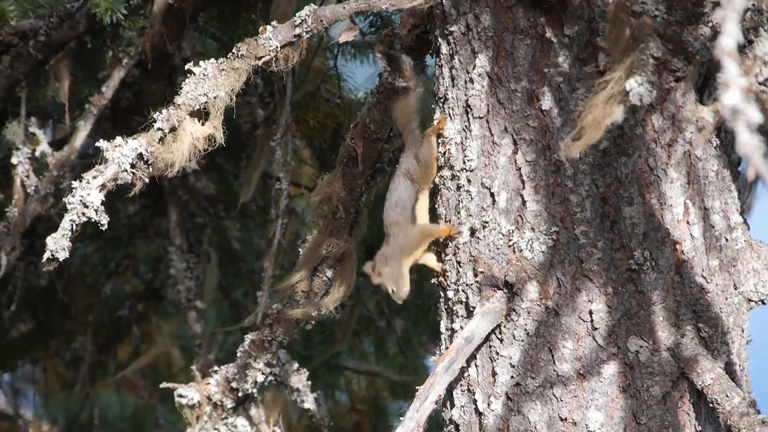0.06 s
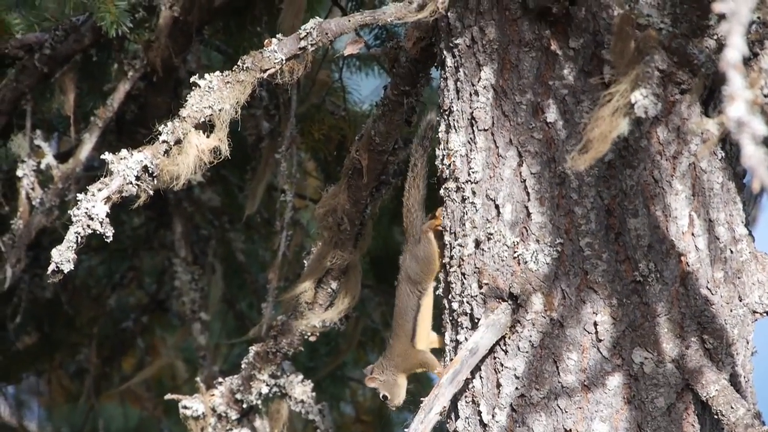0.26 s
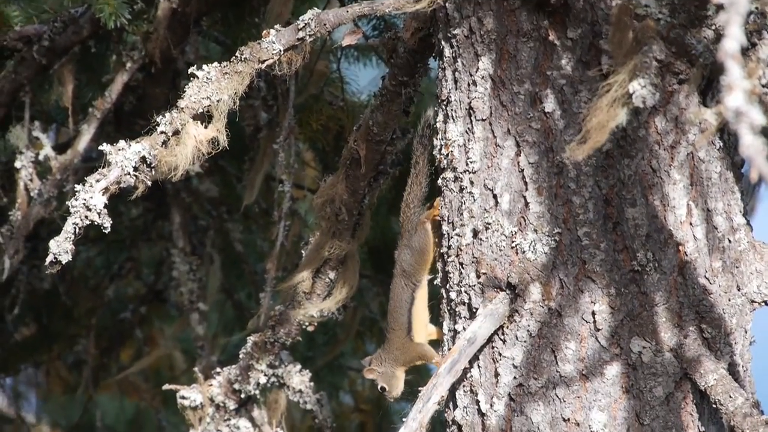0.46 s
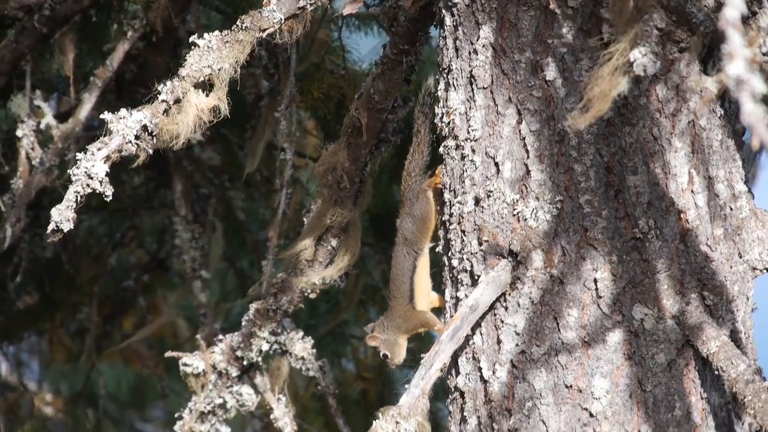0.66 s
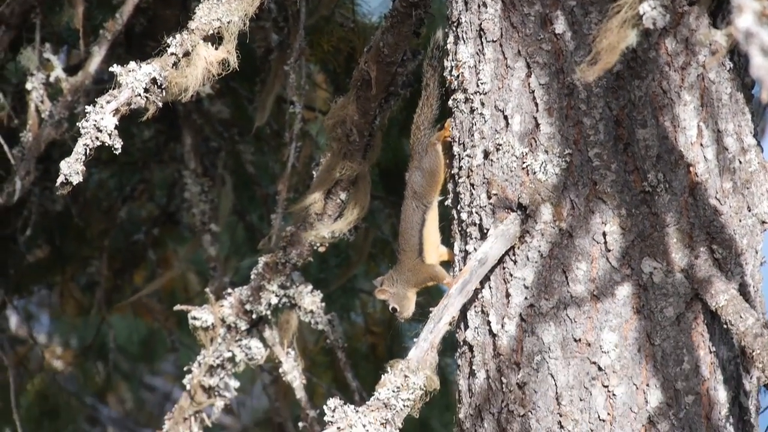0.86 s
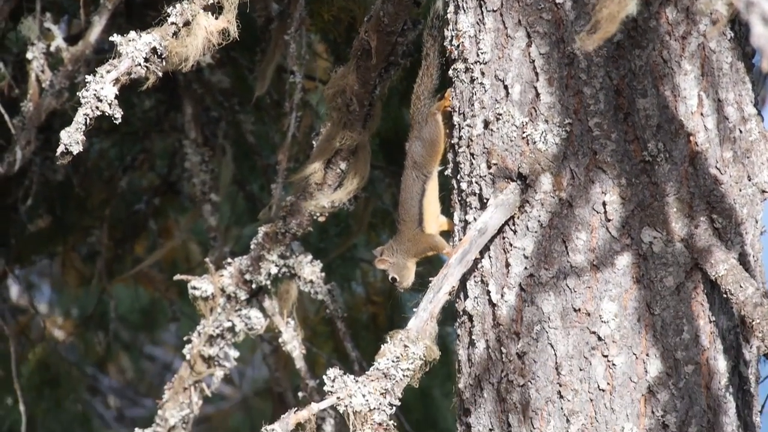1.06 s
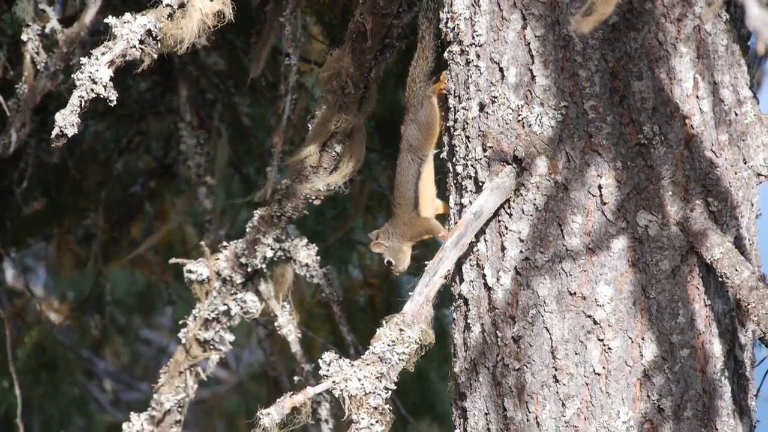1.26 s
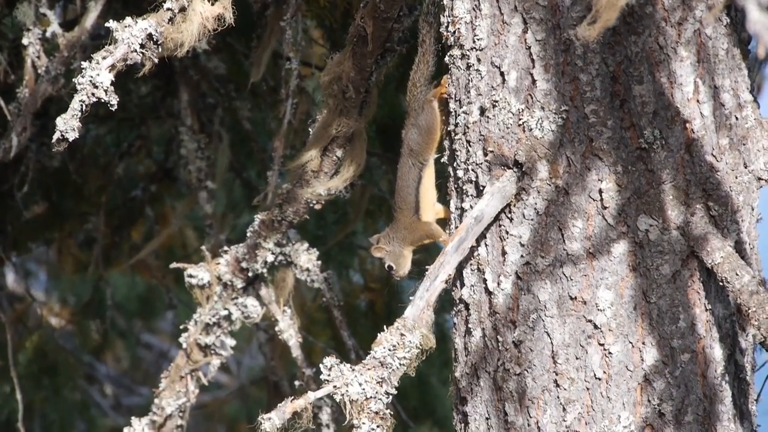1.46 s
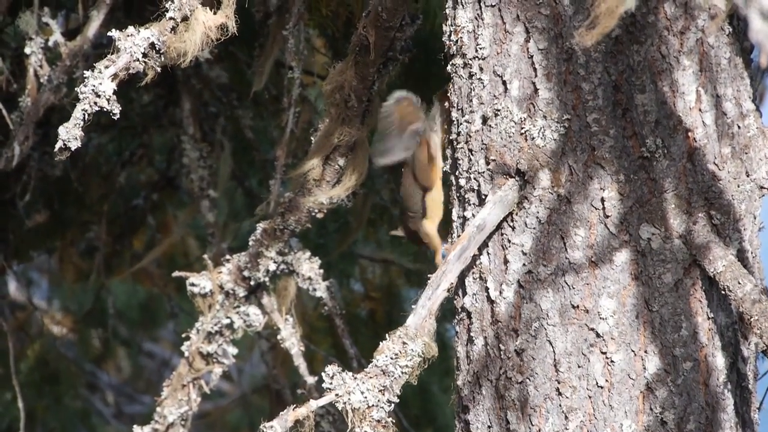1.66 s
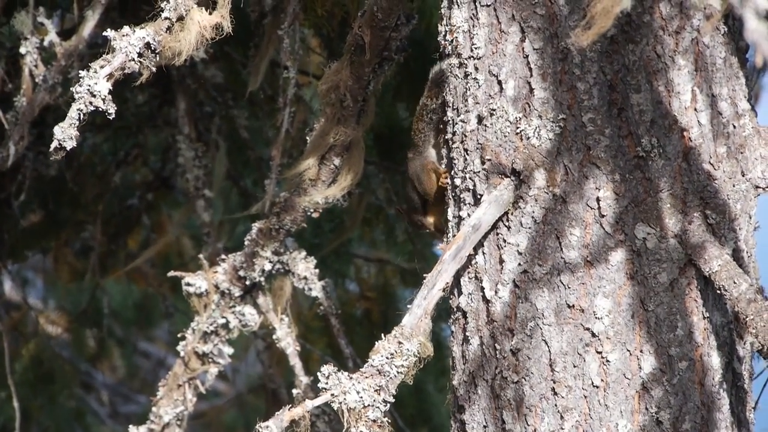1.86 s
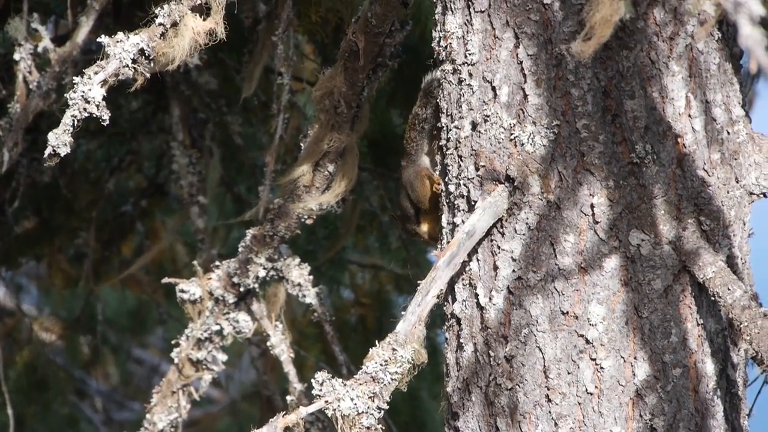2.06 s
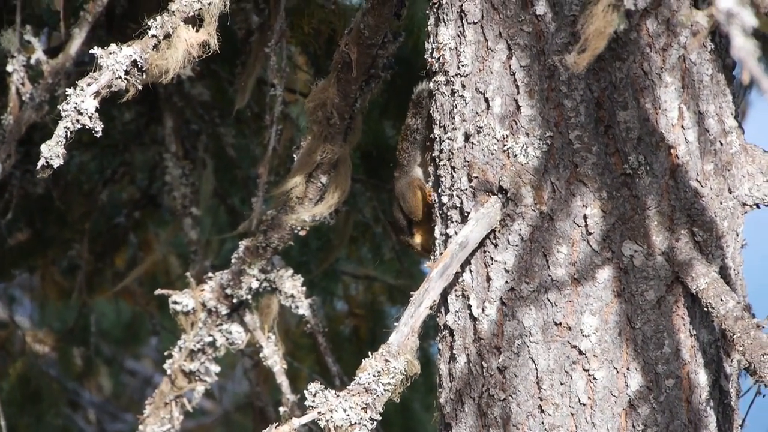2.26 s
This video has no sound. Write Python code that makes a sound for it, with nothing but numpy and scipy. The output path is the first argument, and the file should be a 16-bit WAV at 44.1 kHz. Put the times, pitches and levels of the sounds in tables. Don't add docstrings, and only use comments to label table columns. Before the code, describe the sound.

Two short squirrel alarm calls, bright bark sliding down, over soft forest hum and wind thumps

```python
import sys
import numpy as np
from scipy import signal
from scipy.fft import rfft, irfft, next_fast_len
from scipy.io import wavfile
from scipy.ndimage import uniform_filter1d, map_coordinates

SR = 44100
rng = np.random.default_rng(int(sys.argv[2]) if len(sys.argv) > 2 else 0)


def ratio(d):
    e = np.asarray(d, float) / 20
    return 10 ** e


def generate_wav(sig):
    pcm = np.round(np.clip(np.atleast_2d(sig).T, -1, 1) * 32767).astype(np.int16)
    wavfile.write(sys.argv[1], SR, pcm)


N = 101430

# f/Hz, level/dB
FOREST_COLOUR = [(200, -16), (450, -16.5), (900, -11.5), (1300, -15.5), (1700, -19), (2500, -22.5),
                 (3000, -20.5), (15500, -41.5)]
# f/Hz, width/Hz, level/dB
FOREST_BUMPS = [(776.5, 31.5, 5.5), (912, 15.6, 7), (1137.4, 21, 8.5), (1233, 141, 5.5), (1955, 157, 4),
                (3940, 9.5, 4), (4950, 79, 5), (5600, 35, 1.5)]
# f/Hz, likeness/0-1
FOREST_ALIKE = [(60, 0.19), (180, 0.027), (550, 0.43), (1650, 0.68), (4970, 0.64), (15000, 0.3)]
# f/Hz, left over right level/dB
FOREST_LEAN = [(550, -1), (1300, 2), (2400, 0), (4900, 2), (15000, 0)]
# t/s, level/dB
GUSTS = [(0, -55.5), (.2, -54), (.55, -47), (.69, -56.5), (.8, -45.5), (.92, -52.5), (.945, -72),
         (1.09, -54.5), (1.22, -54.5), (1.31, -59), (1.45, -48), (1.59, -61), (1.74, -58), (1.96, -61),
         (2.1, -55.5), (2.27, -54)]
# f/Hz, level/dB
PORT_COLOUR = [(25, -49), (45, -27.5), (85, -0.5), (140, -0.5), (210, -13.5), (320, -17), (500, -49)]
# t/s, peak level/dB, f/Hz
RIGHT_THUMPS = [(0.022, -35, 167), (0.034, -40, 156), (0.127, -40.5, 161), (0.167, -42, 144),
                (0.185, -41.5, 132), (0.213, -30, 153), (0.261, -32, 155), (0.281, -46, 115),
                (0.307, -41, 179), (0.328, -38, 163), (0.348, -46.0, 122), (0.369, -37, 146),
                (0.38, -35.5, 162), (0.396, -40.5, 162), (0.412, -40, 201), (0.426, -57, 135),
                (0.448, -38.5, 126), (0.474, -38.5, 151), (0.487, -49, 136), (0.501, -49.5, 142),
                (0.515, -40, 145), (0.53, -40.0, 143), (0.558, -48, 137), (0.609, -30.5, 188),
                (0.633, -47, 168), (0.657, -40, 118), (0.743, -48, 140), (0.771, -30.5, 167),
                (0.788, -39, 85), (0.804, -39.5, 160), (0.825, -36.5, 132), (0.848, -44.5, 194),
                (0.865, -37, 152), (0.892, -39, 159), (0.914, -38.5, 129), (0.977, -36, 170),
                (0.993, -36, 153), (1.041, -36, 123), (1.083, -39, 138), (1.109, -42.5, 179),
                (1.144, -35.5, 147), (1.171, -42, 151), (1.182, -27.5, 139), (1.214, -40, 123),
                (1.367, -41, 143), (1.431, -37, 175), (1.448, -52, 128), (1.472, -45, 168),
                (1.495, -35.5, 147), (1.547, -43, 101), (1.717, -44.5, 149), (1.755, -44.5, 126),
                (1.849, -46, 142), (1.869, -40.5, 160), (1.882, -48, 134), (1.906, -47, 161),
                (2.05, -30.5, 168), (2.184, -43, 147), (2.212, -49.5, 114), (2.272, -40, 129)]
# t/s, peak level/dB, f/Hz
LEFT_PUFFS = [
    (.228, -52, 91),
    (.806, -56, 100),
    (.942, -54, 110),
    (1.057, -50, 90),
]
# t/s, peak level/dB,
# f/Hz, width/Hz
TICKS = [(.2245, -49, 5000, 5000), (.281, -48, 8500, 4000), (.297, -55, 9500, 4000),
         (.309, -52, 10500, 5000), (1.7425, -46, 4970, 5000), (1.2332, -51, 750, 110),
         (1.2412, -43.5, 880, 280), (1.2414, -48, 3170, 600), (1.2475, -51, 1150, 150),
         (1.7075, -45.5, 1000, 350), (1.771, -58, 10760, 80), (2.098, -56, 10300, 1200),
         (2.13, -62, 8800, 2500)]
# start t/s, rise/s, fall by 60 dB/s, level/dB
HISS = [
    (0.222, 0.0025, 0.2, -53),
    (1.742, .003, 0.25, -59),
    (.275, 0.02, 0.3, -60),
    (1.79, 0.02, 0.5, -70),
]
# f/Hz, level/dB
HISS_COLOUR = [(3000, -3), (5800, -6), (8000, -11.5), (10200, -3.5), (12000, -16), (13900, -20),
               (14900, -10), (15600, -44)]
# start t/s, rise/s, fall by 60 dB/s, level/dB, f/Hz
BREATH = [
    (.285, .015, 0.17, -66, 11400),
    (.33, 0.047, 0.25, -67.5, 10300),
    (1.8, 0.056, .3, -74, 9400),
]
# start t/s, length/s, level/dB
CHIRPS = [
    (0.2135, 0.0092, -36),
    (1.7286, 0.0086, -41),
]
# t/s, pitch f/Hz, level/dB, mouth opening/0-1, rasp level/dB
BARKS = [
    [(.2235, 2200, -46, 0, -60), (.225, 2175, -40, 0, -52), (.230, 2143, -34.5, .3, -47),
     (.238, 2116, -32.5, .85, -51.5), (.249, 2150, -30, .9, -50), (.2565, 2190, -36, .85, -50),
     (.263, 2140, -42, 1, -55), (.270, 2135, -52, 1, -63), (.278, 2160, -64, 1, -73)],
    [(1.7418, 2210, -47, .3, -58), (1.7435, 2180, -41.5, .2, -52), (1.746, 2162, -40, 0, -50),
     (1.753, 2120, -38.5, .9, -51), (1.758, 2135, -36, 1, -50), (1.764, 2183, -39, .3, -49),
     (1.770, 2175, -46, 1, -52), (1.776, 2145, -58, 1.1, -64), (1.788, 2150, -66, 1, -73)],
]
# level with mouth shut/dB, with mouth open/dB, left over right level/dB
OVERTONES = [
    [(-25, -9.5, 7.5), (-0.5, -16, 0), (0, 0, 0.5), (4.5, -1, -5.5), (-14, -16, 4), (-22, -26, 6)],
    [(-16, -8, 5), (-7, -20, 1), (0, 0, 0.5), (-17, -10, 1), (-26, -30, 3), (-32, -32, 0)],
]
# t/s, pitch f/Hz, level/dB, second partial against the first/dB
SLIDES = [
    [(.266, 2130, -50, -28), (.283, 1916, -38, -42), (.303, 1670, -43, -31), (.321, 1540, -40, -30),
     (.348, 1285, -38.5, -33), (.371, 1160, -45, -28), (.392, 1055, -52, -17), (.418, 890, -63, -4),
     (.452, 690, -62, -16)],
    [(1.781, 2100, -60, -25), (1.791, 1915, -45, -50), (1.817, 1500, -43, -27), (1.836, 1250, -45, -17),
     (1.854, 1190, -45.5, -17), (1.862, 1160, -51, -15), (1.897, 1085, -53, -16), (1.908, 990, -64, -10),
     (1.962, 520, -66, -20)],
]
# f/Hz, left over right level/dB
VOICE_LEAN = [(1200, 0.5), (1800, 0.5), (2150, -0.5), (3000, 3)]
# f/Hz, phase/rad
VOICE_LEAD = [(520, -.3), (1500, -.22), (2150, -.43), (2840, -.14), (3700, -.5), (5250, .1), (5860, -.1),
              (15200, .1)]

FOREST_DB, FOREST_SWAY_DB, PATCHY_DB = -57.3, .5, 1.44
RIGHT_LUMP_DB, LEFT_LUMP_DB = 3, 1.8
LEFT_WIND_DB, LEFT_LIFT = -64, 0.37
PORT_CUT_HZ = 55
THUMP_CYCLES, THUMP_RINGS = 0.39, 2.07
LEAK_DB, LEAK_HZ, BASS_LEAK_DB = -9, 244, -23
NEAR_DB, NEAR_T60_S = -17, .05
FAR_DB, FAR_T60_S, FAR_DELAY_S = -18.5, .38, .012
ECHO_SPREAD = 1.2
BREATH_WIDTH_HZ = 800
CHIRP_FROM_HZ, CHIRP_TO_HZ, CHIRP_BEND, CHIRP_FADE_DB = 1300, 2150, .55, -13
PITCH_JITTER = .002
FLUTTER_DB, FLUTTER_RATE_HZ = 4.2, 250
FAINT_FLUTTER = .05


def unit(x):
    return x / np.sqrt(np.mean(x ** 2) + 1e-20)


def along(points, hz):
    f, v = np.transpose(points)
    return np.interp(np.log(hz + 1), np.log(f + 1), v)


def wobble(rate):
    knots = rng.standard_normal(int(N * 400 / SR) + 4)
    return map_coordinates(knots, [np.arange(N) * min(rate, 400) / SR])


def filtered(x, response):
    m = next_fast_len(N + SR // 2)
    return irfft(rfft(x, m) * response(np.fft.rfftfreq(m, 1 / SR)), m)[..., :N]


def forest():
    z = signal.stft(rng.standard_normal((2, N)), nperseg=512)[2]
    patches = uniform_filter1d(rng.standard_normal(z.shape[1:]), size=5, axis=0)
    patches = uniform_filter1d(patches, size=8, axis=1)
    pair = signal.istft(z * ratio(PATCHY_DB * unit(patches)), nperseg=512)[1][:, :N]

    def colour(hz):
        bumps_db = sum(db * np.exp(-((hz - c) / w) ** 2) for c, w, db in FOREST_BUMPS)
        angle = np.arccos(np.clip(along(FOREST_ALIKE, hz), -1, 1)) / 2
        return ratio(along(FOREST_COLOUR, hz) + bumps_db) * [np.cos(angle), np.sin(angle)]

    def lean(hz):
        return ratio(along(FOREST_LEAN, hz) * (hz > 400) * [[.5], [-.5]])

    mid, side = filtered(pair, colour)
    hum = filtered(np.array([mid + side, mid - side]), lean)
    return ratio(FOREST_DB + FOREST_SWAY_DB * wobble(1.58)) * unit(hum)


def puffs(rows):
    t = np.arange(N) / SR
    phases = rng.uniform(0, 2.14, len(rows))
    out = np.zeros(N)
    for (s, db, hz), phase in zip(rows, phases):
        stretch = np.where(t > s, THUMP_RINGS, 1)
        push = np.exp(-((t - s) * hz / THUMP_CYCLES / stretch) ** 2)
        out += ratio(db) * push * np.cos(2 * np.pi * hz * (t - s) + phase)
    return out


def wind():
    gust_db = np.interp(np.arange(N) / SR, *np.transpose(GUSTS))
    lumps = ratio([LEFT_LUMP_DB * wobble(24.84), RIGHT_LUMP_DB * wobble(70)])
    noise = rng.standard_normal((2, N)) * lumps
    buffet = filtered(noise, lambda hz: ratio(along(PORT_COLOUR, hz) * [[LEFT_LIFT], [1]]) * (hz < 600))
    thumps = filtered(puffs(RIGHT_THUMPS), lambda hz: 1 / (1 + (PORT_CUT_HZ / (hz + 1)) ** 4))
    right = ratio(gust_db) * unit(buffet[1]) + thumps
    leak = filtered(right, lambda hz: ratio(BASS_LEAK_DB) - ratio(LEAK_DB) / (1 + (LEAK_HZ / (hz + 1)) ** 4))
    left_db = LEFT_WIND_DB + 0.65 * (gust_db - gust_db.mean())
    left = ratio(left_db) * unit(buffet[0]) + puffs(LEFT_PUFFS) + leak
    return np.array([left, right])


def trees(x):
    t = np.arange(SR // 2) / SR
    near, far = rng.standard_normal((2, 3, len(t)))
    near = (near[0] + ECHO_SPREAD * near[1:]) * ratio(-60 * t / NEAR_T60_S) * (t > .002)
    far = far[1:] * ratio(-60 * t / FAR_T60_S) * np.clip(t / FAR_DELAY_S, 0, 1)
    near_tail = ratio(NEAR_DB) * near / np.linalg.norm(near[0])
    far_tail = ratio(FAR_DB) * far / np.linalg.norm(far[0])
    return signal.fftconvolve(x.mean(0)[None], near_tail + far_tail, axes=1)[:, :N]


def ticks():
    out, t = np.zeros(N + SR), np.arange(SR // 20) / SR
    for s, db, hz, width in TICKS:
        fall = np.pi * width * t
        start = round(s * SR)
        out[start:start + len(t)] += ratio(db) * np.sin(2 * np.pi * hz * t) * np.exp(1 - fall) * fall
    return out[:N]


def hiss():
    t = np.arange(N) / SR

    def swell(s, rise, t60, db):
        return ratio(db - 60 * np.clip(t - s - rise, 0, None) / t60) * np.clip((t - s) / rise, 0, 1)

    air = rng.standard_normal((3, N))
    air = air[0] + 0.43 * air[1:]
    teeth = unit(filtered(air, lambda hz: ratio(along(HISS_COLOUR, hz))))
    out = teeth * sum(swell(*row) for row in HISS)
    for *row, centre in BREATH:
        lips = filtered(air, lambda hz: np.exp(-((hz - centre) / BREATH_WIDTH_HZ) ** 2))
        out = out + unit(lips) * swell(*row)
    return out * ratio(3.4 * wobble(300) + wobble(60))


def note(rows):
    s, hz, db, extra = np.transpose(rows)
    t = np.arange(N) / SR

    def smooth(v):
        return uniform_filter1d(np.interp(t, s, v), size=90)

    phase = 2 * np.pi * np.cumsum(smooth(hz) * (1 + PITCH_JITTER * wobble(300))) / SR
    gate = uniform_filter1d(1. * (t > s[0]) * (t < s[-1]), size=60)
    return phase, np.sqrt(2) * gate * ratio(smooth(db)), smooth(extra)


def chirp(s, length, db):
    u = np.linspace(0, 1, num=9)
    hz = CHIRP_FROM_HZ + (CHIRP_TO_HZ - CHIRP_FROM_HZ) * u ** CHIRP_BEND
    level_db = db + CHIRP_FADE_DB * u ** 2 - 9 * (u == 0)
    phase, size, _ = note(np.transpose([s + length * u, hz, level_db, u]))
    return size * np.sin(phase)


def bark(rows, overtones):
    rows = np.array(rows)
    phase, size, mouth = note(rows[:, :4])
    rasp = note(rows[:, [0, 1, 4, 3]])[1]
    out = size * np.sin(phase) * np.ones((2, 1))
    for k, (shut_db, open_db, lean_db) in enumerate(overtones):
        level = ratio(shut_db + (open_db - shut_db) * mouth + .8 * wobble(120))
        sides = ratio([[lean_db / 2], [-lean_db / 2]])
        source = rasp if k else size
        out += sides * source * level * np.sin((k + 2) * phase + rng.uniform(0, 2 * np.pi))
    return out


def whistle(rows):
    phase, size, second_db = note(rows)
    faint_db = -20 * np.log10(size / size.max() + 1e-2)
    flutter = ratio((FLUTTER_DB + FAINT_FLUTTER * faint_db) * np.tanh(wobble(FLUTTER_RATE_HZ)))
    second = ratio(second_db + 3.2 * wobble(110)) * np.sin(2 * phase)
    return size * flutter * (np.sin(phase) + second)


def squirrel():
    out = np.zeros((2, N))
    for row in CHIRPS:
        out += chirp(*row)
    for rows, overtones in zip(BARKS, OVERTONES):
        out += bark(rows, overtones)
    for rows in SLIDES:
        out += whistle(rows)

    def ears(hz):
        left = ratio(along(VOICE_LEAN, hz) / 2) * np.exp(.5j * along(VOICE_LEAD, hz))
        return np.array([left, 1 / left])

    return filtered(out, ears)


def scene():
    near = squirrel() + ticks()
    return near + trees(near) + hiss() + wind() + forest()


def low_pass(x):
    return signal.sosfilt(signal.butter(12, 15690, fs=SR, output="sos"), x)


def record(dry):
    mix = filtered(dry, lambda hz: hz < 15690)
    return low_pass(mix)


dry = scene()
out = record(dry)
generate_wav(out)
```